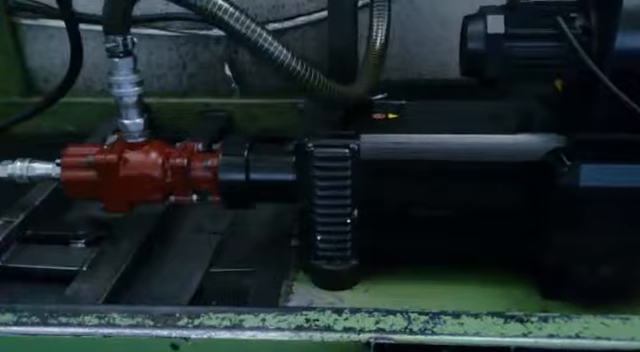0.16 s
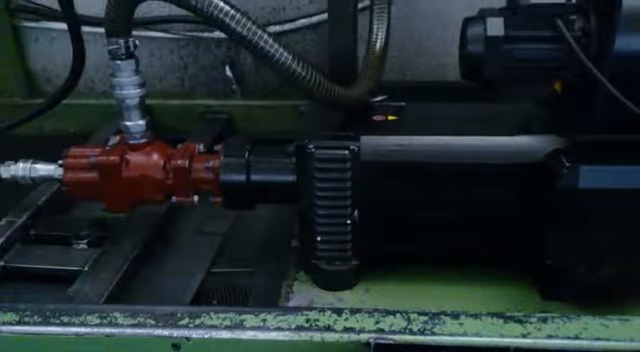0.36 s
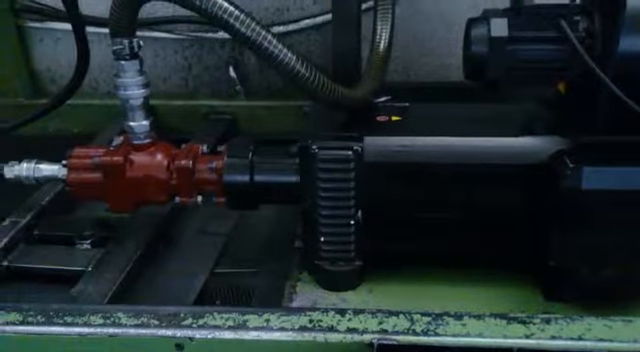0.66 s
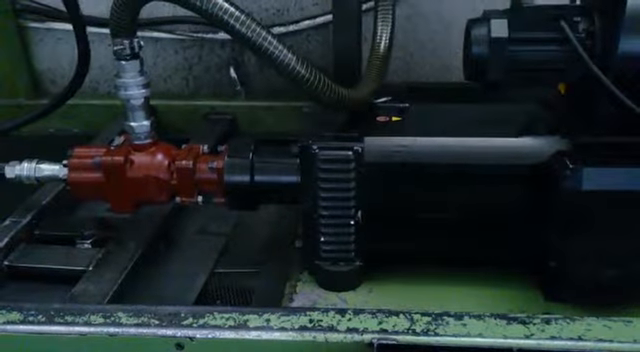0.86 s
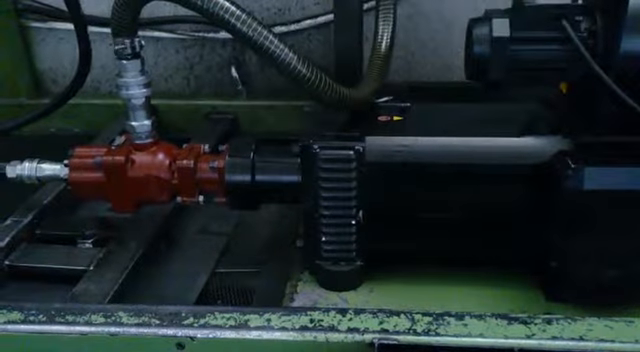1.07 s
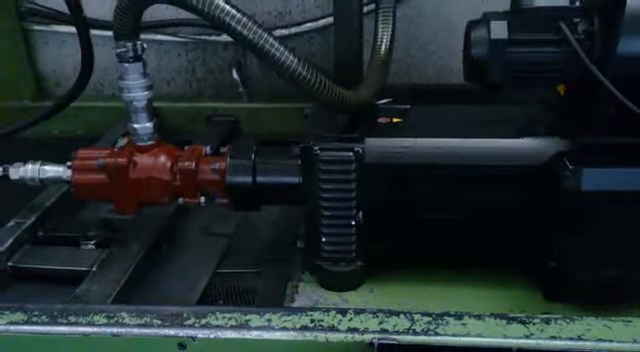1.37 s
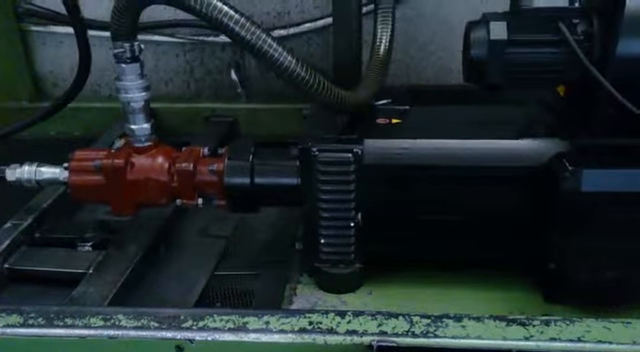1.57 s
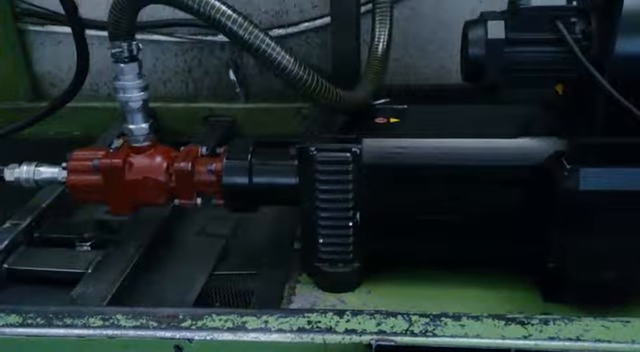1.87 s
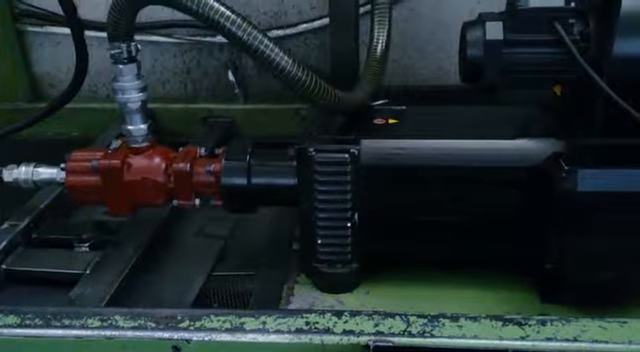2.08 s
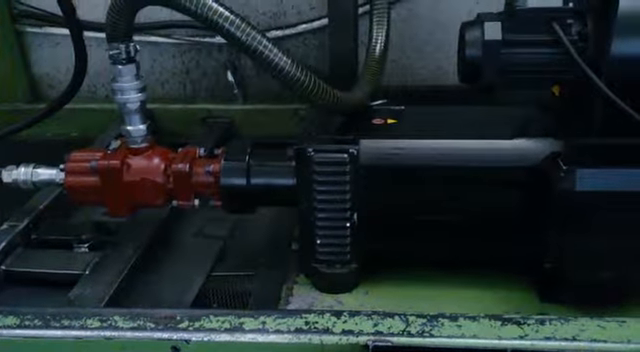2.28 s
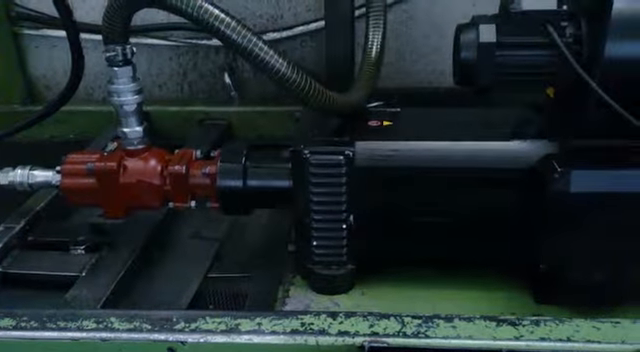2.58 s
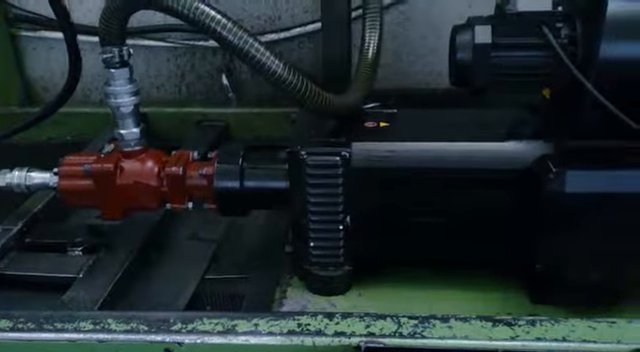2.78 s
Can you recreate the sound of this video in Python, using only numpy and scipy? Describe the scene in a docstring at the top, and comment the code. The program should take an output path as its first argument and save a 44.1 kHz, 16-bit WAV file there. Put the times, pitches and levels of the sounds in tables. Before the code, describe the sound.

Steady loud motor-and-pump hum with high electrical whine and rushing roar, faint metallic knocks behind

```python
"""Workshop test bench: a nine-piston hydraulic pump runs steadily, driven by an inverter-fed motor.
Shaft and piston orders, drive whine and a beating pair, all summed sines, stand out of a roar of oil flow,
casing and fans, made of shaped noise whose hiss pulses with every piston stroke. Metal clanks, decaying
noise bursts, sound farther off in the hall among fuzzy rings of narrow-band noise. Two microphone ports."""
import sys
import numpy as np
from scipy import signal
from scipy.fft import rfft, irfft
from scipy.io import wavfile
from scipy.ndimage import uniform_filter1d

SR = 44100
rng = np.random.default_rng(int(sys.argv[2]) if len(sys.argv) > 2 else 0)


def file_out(sig):
    """Save sig as 16-bit WAV at sys.argv[1]."""
    # one column per channel
    cols = np.atleast_2d(sig).T
    # limit, then scale
    lim = np.clip(cols, -1, 1)
    pcm = np.round(lim * 32767).astype(np.int16)
    wavfile.write(sys.argv[1], SR, pcm)


N = 129654
TIME = np.arange(N) / SR  # s
SHAFT_HZ, PISTONS = 17.022, 9


def amp(db):
    """Decibel law: 20 dB is a factor of ten in amplitude."""
    return 10 ** (np.asarray(db) / 20)


def evened(x):
    """Normalization: equal mean power, rms 1."""
    return x / np.sqrt(np.mean(x ** 2) + 1e-20)


def read(points, hz):
    """Spectral envelope: interpolation along a logarithmic frequency axis."""
    f, value = np.transpose(points)
    return np.interp(np.log(hz + 1), np.log(f + 1), value)


def course(points, t=TIME):
    """Temporal envelope: linear interpolation between (time [s], level [dB]) points."""
    return np.interp(t, *np.transpose(points))


def drift(top_hz, t):
    """Slow random modulation: sines of random phase, weaker towards top_hz, rms 1."""
    waves = []
    for f in np.geomspace(.3, top_hz, 12):
        waves.append(np.sin(2 * np.pi * (f * t + rng.random())) / np.sqrt(f))
    return evened(sum(waves))


def band(x, lo_hz, hi_hz):
    """Zero-phase band-pass: soft spectral edges without delay."""
    hz = np.fft.rfftfreq(N, 1 / SR)
    low_cut, high_cut = 1 + (lo_hz / (hz + 1)) ** 8, 1 + (hz / hi_hz) ** 8
    return irfft(rfft(x) / low_cut / high_cut, N)


def narrow(hz, width_hz):
    """Narrow-band noise: white noise through a resonance-like peak, rms 1."""
    offset = 2 * (np.fft.rfftfreq(N, 1 / SR) - hz) / width_hz
    return evened(irfft(rfft(rng.standard_normal(N)) / (1 + offset ** 4), N))


def tones(rows, together_s=None):
    """Superposition of sines wavering in level and phase; before the waver, phases meet at together_s."""
    waver_db, waver_rad, waver_hz = 1.2, .3, 24
    coarse = TIME[::256]
    out = np.zeros((2, N))
    for hz, left_db, right_db, lead in rows:
        waver = np.interp(TIME, coarse, drift(waver_hz, coarse))
        slip = np.interp(TIME, coarse, drift(waver_hz, coarse))
        start = rng.random() if together_s is None else -hz * together_s  # cycles
        phase = 2 * np.pi * (hz * TIME + start) + waver_rad * slip
        gain = amp([[left_db], [right_db]] + waver_db * waver)
        out += np.sqrt(2) * gain * np.sin([phase + lead, phase])
    return out


def throb():
    """Periodic modulation by rotation: level changes once and twice a turn."""
    once, twice = .1, .33
    turns = SHAFT_HZ * TIME
    return once * np.cos(2 * np.pi * turns) + twice * np.cos(4 * np.pi * turns)


# spurt strength of each piston in turn, before random spread: (level [dB])
PISTON_LEVEL = (2, 0, 0, -2, -3, -2, -1, -1, 0)


def strokes():
    """Amplitude modulation by flow pulses: each stroke spurts and decays, unevenly, deeper on the left."""
    first_stroke_s, spread_db = .0046, 2.2
    depths, decay = (2.8, 1.3), .24  # left and right; decay in stroke periods
    count = PISTONS * SHAFT_HZ * (TIME - first_stroke_s) + PISTONS
    which = count.astype(int)
    spread = spread_db * rng.standard_normal(which[-1] + 1)[which]
    size = amp(np.take(PISTON_LEVEL, which % PISTONS) + spread)
    spurt = size * np.exp(-(count % 1) / decay)
    return np.array([evened(1 + depth * spurt) for depth in depths])


# spectral shape of the roar: (frequency [Hz], relative density [dB per Hz])
ROAR_COLOUR = [(20, -14.5), (60, -17), (130, -8), (250, -4.5), (420, -6.5), (600, -11), (760, -6.5),
               (1100, -6.5), (1300, -7.5), (1420, -12.5), (1750, -14.5), (2400, -14), (3300, -17.5),
               (4200, -17), (5000, -15), (6200, -17.5), (7600, -16.5), (10000, -19.5), (10600, -24.5),
               (11800, -22.5), (12600, -35.5), (14800, -30), (15200, -46)]
# casing resonances: (frequency [Hz], width [Hz], height over the roar [dB])
CASING_PEAKS = [(875, 197, 7), (1350, 19.4, 11.5), (2042, 216, 10), (2010, 79, 1.5), (9060, 210, 7.5)]
# likeness of the two ports: (frequency [Hz], left-right coherence [0 to 1])
LIKENESS = [(25, 1), (60, 1), (250, 0.92), (500, 0.69), (900, 0.64), (1150, 0.13), (1600, 0.55),
            (2200, 0.16), (6000, 0.064), (10000, 0.19)]
# balance of the two ports: (frequency [Hz], left minus right [dB])
BALANCE = [(25, -18), (60, -12.5), (140, -5), (250, -6.5), (330, -0.5), (500, -10.5), (760, -1),
           (1200, -4.5), (2000, -2.5), (3300, -0.5), (5450, -3.5), (9000, 4), (14900, 0)]
# phase between the two ports: (frequency [Hz], left lead [rad])
PHASE_LEAD = [(20, 0.85), (90, 0.14), (300, 0.43), (500, 0.079), (850, 0.2), (1100, 0.81), (1800, 2.73),
              (2800, 5.6), (5000, 9.7), (9000, 14.2)]
# changing level of the low-middle roar: (time [s], level [dB])
LOW_MID_COURSE = [(0, 0.5), (.3, -0.5), (.6, 4), (1.0, 4), (1.4, 2), (1.9, -1), (2.5, -2), (2.94, 4)]
# changing level of the rumble: (time [s], level [dB])
RUMBLE_COURSE = [(0, 1), (.2, 2), (.45, 0.5), (.7, -0.5), (.9, 4), (1.1, -1.5), (1.3, 2), (1.6, 0.5),
                 (1.9, -3), (2.2, 0), (2.5, -0.5), (2.75, 0.5), (2.94, -2)]


def roar():
    """Broadband flow and fan noise coloured by casing resonance; shaft and pistons modulate its bands."""
    level_db, patchy_db, swell_db, lumps_db = -23, 1.0, .25, 1.3  # overall level is set before modulation
    low_mid_hz, low_mid_width_hz, rumble_top_hz = 442, 81, 300
    size, hop = 2048, 512
    frames, hz = N // hop + 5, np.fft.rfftfreq(size, 1 / SR)
    frame_s = np.arange(frames) * hop / SR
    a, b, c, d, patches = rng.standard_normal((frames, len(hz), 5)).T
    patches = uniform_filter1d(patches, 6, 0)  # across frequency
    patches = evened(uniform_filter1d(patches, 5, 1))  # across time

    # partial coherence: the left port shares part of the right port's noise
    same = np.clip(read(LIKENESS, hz), 0, 1)[:, None]
    right = a + 1j * b
    left = same * right + np.sqrt(1 - same ** 2) * (c + 1j * d)
    left = left * np.exp(1j * read(PHASE_LEAD, hz))[:, None]

    colour = read(ROAR_COLOUR, hz)
    for f, width, db in CASING_PEAKS:
        colour = colour + db / (1 + (2 * (hz - f) / width) ** 2)
    field = colour[:, None] + patchy_db * patches + swell_db * drift(2.1, frame_s)  # dB
    low_mid_offset = 2 * (hz[:, None] - low_mid_hz) / low_mid_width_hz
    field += course(LOW_MID_COURSE, frame_s) / (1 + low_mid_offset ** 2)
    rumble_db = course(RUMBLE_COURSE, frame_s) + lumps_db * patches
    field += rumble_db / (1 + (hz[:, None] / rumble_top_hz) ** 4)

    tilt = read(BALANCE, hz)[:, None] / 2
    spectra = np.array([left * amp(field + tilt), right * amp(field - tilt)])
    noise = signal.istft(spectra, nperseg=size, noverlap=size - hop)[1][:, :N]
    noise = amp(level_db) * evened(noise)
    casing_throb = throb() * band(noise, 706, 1070)
    hiss_pulse = (strokes() - 1) * band(noise, 8000, 10800)
    return noise + casing_throb + hiss_pulse


# shaft orders: (multiple of shaft speed, left level [dB], right level [dB], left lead [rad])
SHAFT_ORDERS = [(1, -61, -45, 1.2), (4, -64, -56, .6), (5, -56, -48, .5), (17, -52, -47, .3),
                (18, -41, -40, 0.), (19, -55, -50, .1), (27, -49, -39, 1.3), (32, -70, -50, -1.1),
                (35, -51, -59, 1.3), (36, -48, -47, .1), (37, -56, -49, .1), (45, -43, -47, 1.5),
                (46, -47, -48, .7), (48, -49, -47, .2), (51, -52, -46, 0.), (54, -43, -41, .1),
                (55, -48, -45, .1), (60, -65, -46, -2.1), (62, -46, -44, .9), (63, -59, -45, 1.3),
                (64, -48, -51, -2.0), (73, -56, -47, 2.1)]


def pump_orders():
    """Harmonic series of rotation: tones at whole multiples of the shaft speed."""
    return tones([(order * SHAFT_HZ, *rest) for order, *rest in SHAFT_ORDERS])


# two close tones before swelling: (frequency [Hz], left level [dB], right level [dB], left lead [rad])
BEATING_PAIR = [(897.1, -37, -34, .3), (902.17, -37, -38, .7)]
# swelling and sinking of the pair: (time [s], level [dB])
BEAT_COURSE = [(0, 1), (.25, -3), (.4, 2), (1.0, 0.5), (1.4, 3), (1.6, -2), (1.8, 3), (1.97, -5),
               (2.15, 1.5), (2.4, 3), (2.6, -3), (2.94, -4)]


def beating_pair():
    """Beating by interference: two close tones swell about five times a second and throb with the shaft."""
    pair = tones(BEATING_PAIR, together_s=.02)
    return (1 + throb() / 2) * amp(course(BEAT_COURSE)) * pair


# steady motor and drive tones: (frequency [Hz], left level [dB], right level [dB], left lead [rad])
DRIVE_TONES = [(1794.2, -56, -53, .3), (1934.0, -53, -46, -.7), (3103.1, -60, -58, -2.0),
               (3794.2, -63, -53, 1.5), (3931.0, -52, -46, .4), (3999.7, -50, -48, 2.8),
               (4069.0, -52, -44, -.5), (4137.4, -52, -45, -1.2), (4622.8, -52, -56, .2),
               (4760.2, -49, -62, 1.1), (5034.7, -58, -54, .6), (5240.5, -42, -43, .5),
               (5309.2, -55, -63, 1.8), (5588.4, -53, -52, 2.1), (5794.6, -57, -55, 2.1),
               (7932.0, -55, -60, -.9), (8000.7, -42, -42, .3), (8069.5, -58, -60, .3),
               (10000.7, -54, -69, -1.6)]
# loudest whine: (frequency [Hz], left relative level [dB], right relative level [dB], left lead [rad])
LOUDEST_WHINE = [(2000.15, 2.5, -.5, -1.2)]
# level to which the loudest whine's own levels add: (time [s], level [dB])
LOUDEST_COURSE = [(0, -32), (.12, -36), (.3, -32), (.5, -30.5), (.66, -36), (.75, -32), (1.1, -31),
                  (1.25, -34.5), (1.45, -31), (1.9, -34.5), (2.3, -31), (2.55, -35), (2.94, -33.5)]


def drive_whine():
    """Tonal noise of motor and drive: discrete sines, the loudest following its own level envelope."""
    return tones(DRIVE_TONES) + amp(course(LOUDEST_COURSE)) * tones(LOUDEST_WHINE)


# level of the thin tone, before its port offsets: (time [s], level [dB])
FICKLE_COURSE = [(0.0, -56), (0.08, -54), (0.24, -59), (0.27, -49), (0.91, -58), (1.18, -57), (1.26, -48),
                 (1.65, -44), (1.7, -47), (1.85, -45), (1.87, -39), (2.25, -46), (2.28, -32), (2.34, -51),
                 (2.52, -39), (2.69, -44), (2.73, -35), (2.94, -50)]


def fickle_tone():
    """Amplitude modulation of a pure tone: a thin sine whose strength drifts widely, almost all on the right."""
    # frequency [Hz], left and right relative level [dB], left lead [rad]
    return amp(course(FICKLE_COURSE)) * tones([(4268.5, -38, 3, 2.2)])


# level of the fuzzy ring at the right port: (time [s], level [dB])
FUZZ_COURSE = [(0.0, -35), (0.09, -41), (1.05, -33), (1.13, -50), (1.24, -27), (1.27, -44), (1.4, -30),
               (1.49, -42), (1.53, -31), (1.6, -45), (2.72, -41), (2.75, -40), (2.87, -48), (2.94, -40)]


def fuzz():
    """Narrow-band noise under a level envelope: a fuzzy ring just above the loudest whine."""
    hz, width_hz, left_db = 2183, 93, -11.5  # left relative to right
    return amp(course(FUZZ_COURSE)) * narrow(hz, width_hz) * amp([[left_db], [0]])


# distant blows: (time [s], level before decay [dB], brightness [dB per octave], 60 dB decay time [s])
BLOWS = [(.33, -33, -1, .5), (.625, -22, .6, .7), (.935, -26, -1, .5), (1.22, -26, -1, .5),
         (2.733, -21, 1.3, .45), (2.778, -21.5, -.5, 1.0)]
# spectral shape of the blows before brightness: (frequency [Hz], relative level [dB])
BLOW_COLOUR = [(300, -3), (900, 11.5), (1700, 6), (2800, 0), (4200, -0.5), (6500, -8.5), (12000, -33)]


def clanks():
    """Exponential reverberant decay: each distant blow is a rattling noise burst dying in the hall."""
    rise_s, rattle_db, rattle_s = .008, 1.6, .004
    out, t = np.zeros((2, N + SR)), np.arange(SR) / SR
    hz = np.fft.rfftfreq(SR, 1 / SR)
    for start_s, level_db, bright_db, t60 in BLOWS:
        colour = amp(read(BLOW_COLOUR, hz) + bright_db * np.log2(hz + 20))
        burst = evened(irfft(rfft(rng.standard_normal((2, SR))) * colour, SR))
        rattle = evened(uniform_filter1d(rng.standard_normal(SR), round(rattle_s * SR)))
        burst *= amp(rattle_db * rattle - rattle_db / 2)
        envelope = np.minimum(t / rise_s, 1) * amp(level_db - 60 * t / t60)
        at = round(start_s * SR)
        out[:, at:at + SR] += envelope * burst
    return out[:, :N]


# short fuzzy rings: (time [s], hold [s], frequency [Hz], width [Hz], right level [dB])
SHORT_RINGS = [(.33, .05, 4840, 140, -43), (.625, .08, 4855, 140, -37), (.94, .07, 4850, 140, -37),
               (1.23, .07, 4855, 140, -38.5), (1.36, .03, 4845, 140, -42), (2.747, .012, 2700, 300, -30),
               (2.79, .04, 2680, 300, -38)]


def rings():
    """Gated narrow-band noise: short rings rise, hold and fade, with energy set by their envelope."""
    rise_s, fade_db_per_s, left_db = .006, 600, -5  # left relative to right
    out = np.zeros((2, N))
    for start_s, hold_s, hz, width_hz, db in SHORT_RINGS:
        rise = np.clip((TIME - start_s) / rise_s, 0, 1)
        shape = rise * amp(-fade_db_per_s * np.maximum(TIME - start_s - hold_s, 0))
        ring = shape * narrow(hz, width_hz)
        ring *= np.linalg.norm(shape) / np.linalg.norm(ring)
        out += amp(db + np.array([[left_db], [0]])) * ring
    return out


def scene():
    """Linear superposition: all the sources add at the two ports."""
    machine = roar() + pump_orders() + beating_pair() + drive_whine() + fickle_tone()
    return machine + fuzz() + clanks() + rings()


def record(dry):
    """Band limitation: a linear-phase low-pass filter removes the highest treble."""
    edge_hz = 15450
    lowpass = signal.firwin(1501, edge_hz, window=("kaiser", 9), fs=SR)
    return signal.oaconvolve(dry, lowpass[None], "same")


dry = scene()
out = record(dry)
file_out(out)
```